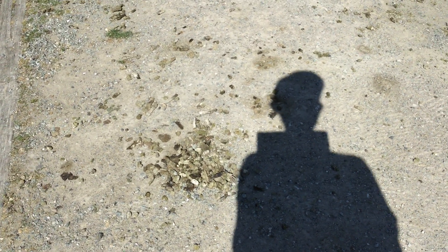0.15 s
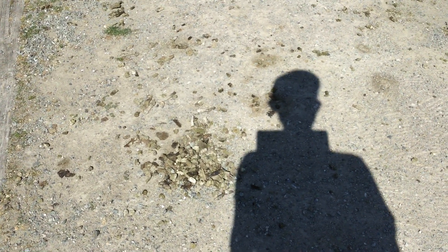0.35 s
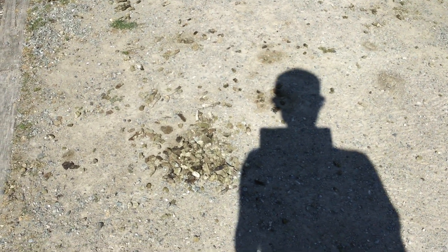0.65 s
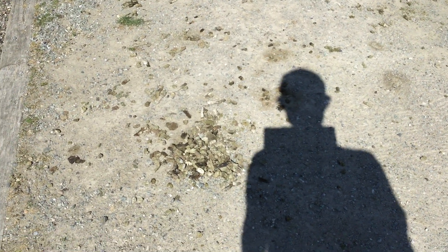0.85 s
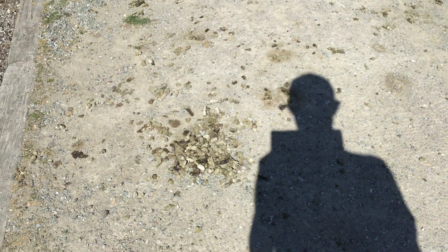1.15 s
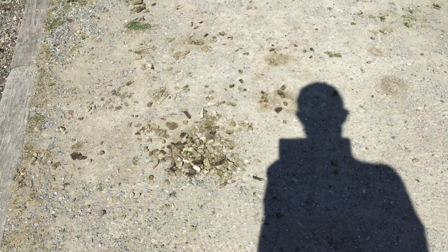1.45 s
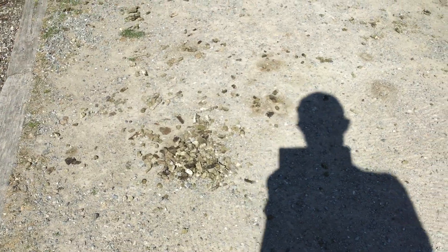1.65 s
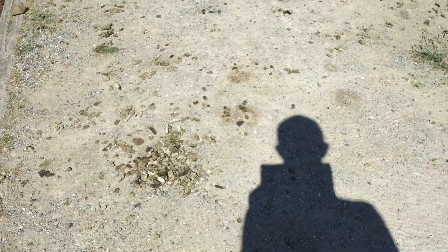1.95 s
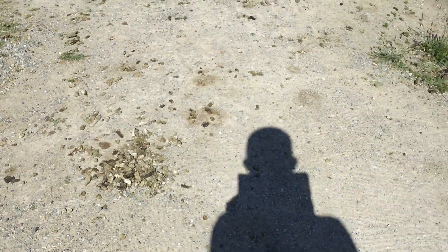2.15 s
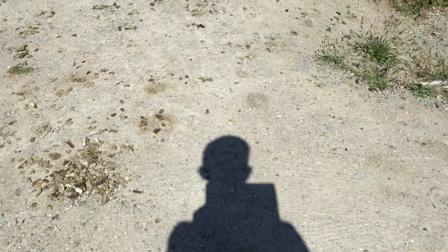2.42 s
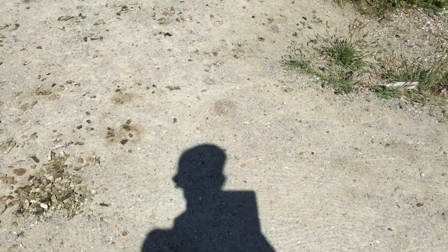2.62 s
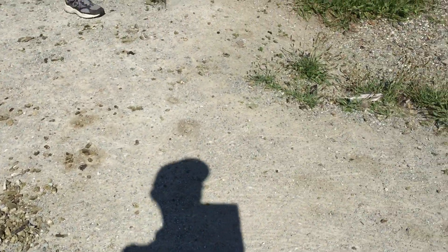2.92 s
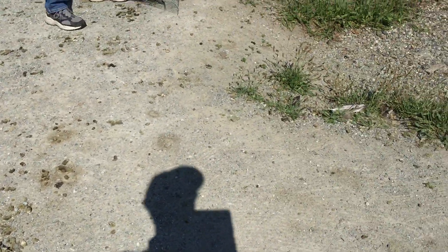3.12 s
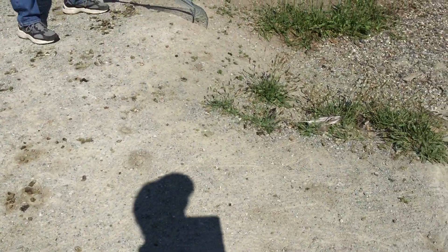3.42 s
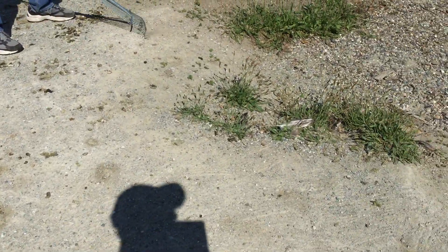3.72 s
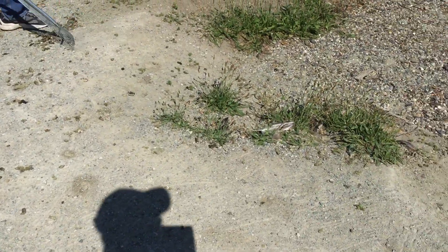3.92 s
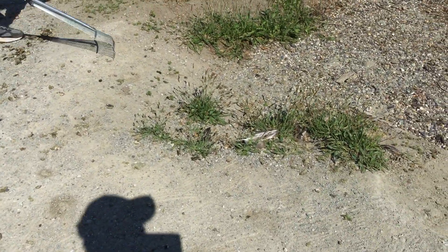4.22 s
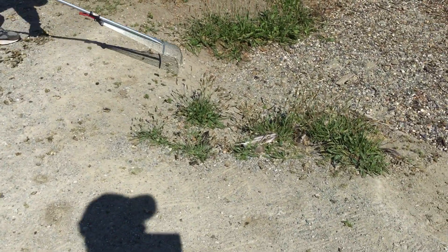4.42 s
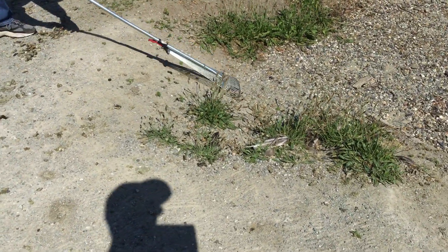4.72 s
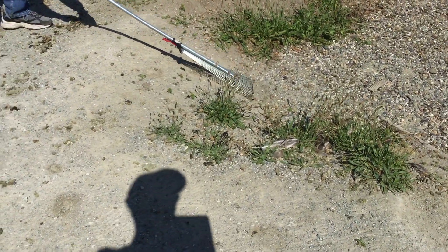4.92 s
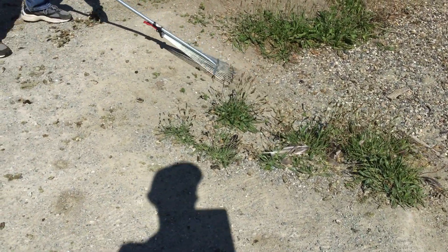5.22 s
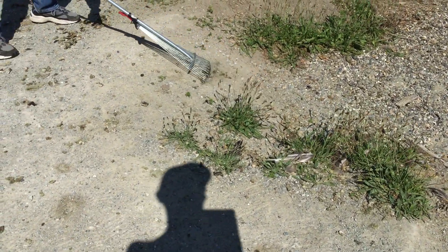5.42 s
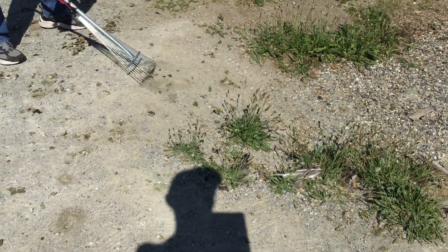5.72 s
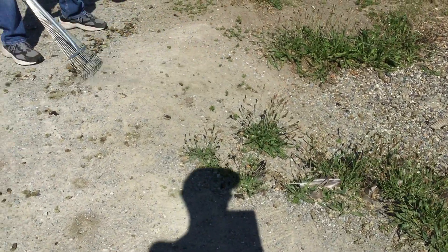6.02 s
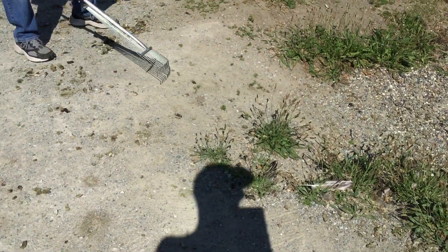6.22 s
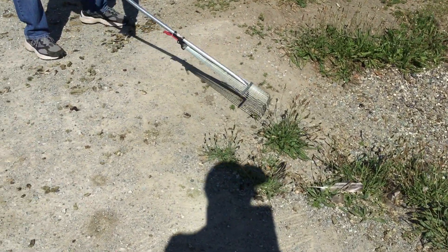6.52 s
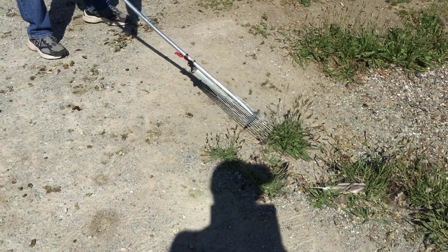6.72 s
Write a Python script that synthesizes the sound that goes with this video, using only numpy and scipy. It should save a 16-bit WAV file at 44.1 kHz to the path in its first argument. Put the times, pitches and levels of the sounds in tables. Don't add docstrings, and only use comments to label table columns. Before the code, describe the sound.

A few steps away outdoors, a springy metal fan rake pulls across dry gravel in separate strokes, each swelling from stone clicks to a bright, rattling scrape with short metallic ringing. Between strokes, pebbles crunch underfoot and grit ticks down. Wind rumbles and thumps on the handheld microphone, stronger near the end, with small taps and knocks on its casing. A faint bird chirp comes just before the last stroke starts.

```python
import sys
import numpy as np
from scipy import signal
from scipy.fft import rfft, irfft, next_fast_len
from scipy.io import wavfile
from scipy.ndimage import uniform_filter1d, map_coordinates

SR = 44100
rng = np.random.default_rng(int(sys.argv[2]) if len(sys.argv) > 2 else 0)


def materialize(psi):
    bounded = np.clip(np.atleast_2d(psi).T, -1, 1)
    quanta = np.round(bounded * 32767).astype(np.int16)
    wavfile.write(sys.argv[1], SR, quanta)


def linear_from_db(decibels):
    return 10 ** (np.asarray(decibels, float) / 20)


N = 302526

# (time [s], scrape level [dB])
STROKE_PRESSURE = [
    [(0.0, -44), (0.106, -46), (0.116, -41), (0.186, -61), (0.47, -75.5), (0.56, -90), (0.716, -74),
     (0.75, -92), (0.767, -66)],
    [(0.77, -61), (0.9, -67), (1.4, -46.5), (1.54, -41.5), (1.62, -51.5), (1.708, -61.5), (1.83, -65.5),
     (1.93, -82), (2.245, -76.5)],
    [(2.254, -57.5), (2.362, -60.5), (2.538, -51), (2.862, -44.5), (2.978, -64), (3.418, -82.5),
     (3.428, -64.5), (3.466, -92), (3.488, -53)],
    [(3.491, -50), (3.52, -60.5), (3.61, -59), (3.66, -50), (3.92, -50), (3.99, -63), (4.34, -71.5),
     (4.5, -96), (4.77, -70.5)],
    [(4.784, -54.5), (4.826, -62.5), (5.078, -66.5), (5.19, -52), (5.6, -51.5), (5.93, -47), (6.0, -49),
     (6.1, -73.5), (6.7, -79.5)],
]
# (time [s], scrape level [dB])
LAST_STROKE_PRESSURE = [
    (6.707, -54.5),
    (6.813, -63.5),
    (6.86, -59.5),
]
LIFTS = [.62, 2.0, 3.3, 4.55, 6.69]
# (grit brightness [dB], stone weight [dB])
FAN_ANGLES = [(-2.5, 0), (-4.5, -3.5), (-1.5, -2), (-3.5, 0.5), (-4.5, -0.5), (-4, -1)]
# (frequency [Hz], bandwidth [Hz], level [dB])
TINE_MODES = [(1850, 142, 0.5), (2420, 174, 1.5), (2900, 262, -1), (3646, 155, -1.5), (4020, 230, -3),
              (4655, 147, -5), (5450, 114, -2.5), (5920, 75, -3), (6500, 173, -2.5), (7100, 210, -10.5),
              (7720, 74, -8), (9400, 193, -5.5), (14400, 430, -10.5), (15600, 170, -10.5)]
# (time within the stroke [s], tine [Hz], extra level [dB])
TINE_TILTS = [(.1, 1850, 4.5), (.1, 2900, 9.5), (.1, 4020, 6), (.1, 5450, 5), (.1, 7720, -18),
              (1.3, 1850, 4), (1.3, 2900, 6), (1.3, 4020, 3.5), (1.3, 4655, -12), (1.3, 5920, -7),
              (1.3, 7720, -25), (1.3, 9400, -4.5), (2.6, 2420, -1.5), (2.6, 3646, 1.5), (2.6, 5450, -2),
              (2.6, 6500, 2), (2.6, 7720, 5), (2.6, 5920, 2.5), (2.6, 14400, -21), (3.8, 5920, 3.5),
              (3.8, 6500, 2.5), (3.8, 7720, 6.5), (3.8, 3646, -1.5), (3.8, 1850, -2.5), (5.5, 2420, 2),
              (5.5, 4655, 2.5), (5.5, 5450, -3), (5.5, 6500, -2.5), (5.5, 1850, -0.5), (5.5, 4020, -6),
              (5.5, 5920, -1.5), (5.5, 7720, 1.5), (6.8, 2420, 2.5), (6.8, 6500, 7), (6.8, 5450, -20),
              (5.5, 9400, -2), (2.6, 1850, -3), (.1, 6500, 0)]
# (frequency [Hz], density [dB per Hz])
GRIT_COLOUR = [(410, -8), (700, -8.5), (1240, -3.5), (2940, 1.5), (4020, -4), (4340, -4), (6590, -8.5),
               (8450, -9), (9380, -11), (10100, -8.5), (15800, -13.5)]
# (time [s], peak level [dB])
STONE_HEAPS = [(1.1103, -53), (1.1692, -52), (1.265, -32), (1.3039, -37.5), (1.3528, -38),
               (1.3852, -36), (1.4331, -28), (1.498, -25), (1.534, -26), (1.576, -27),
               (2.4712, -60), (2.5116, -33.5), (2.555, -63), (2.595, -32), (2.641, -31), (2.6897, -46),
                   (2.731, -27), (2.7685, -35), (2.7979, -33), (2.8463, -33), (2.8995, -39),
               (3.559, -57), (3.6236, -40), (3.676, -34), (3.742, -33), (3.781, -35), (3.8307, -38),
                    (3.8766, -33.5), (3.9044, -34),
               (5.2514, -45), (5.319, -32.5), (5.3621, -61), (5.4165, -59), (5.48, -34),
                      (5.5786, -45), (5.62, -42), (5.6579, -39), (5.689, -34), (5.7308, -36), (5.7677, -39),
                      (5.8156, -36), (5.8789, -34), (5.9054, -33), (5.9438, -50), (5.9787, -36)]
# (start [s], end [s], frequency [Hz], bandwidth [Hz], level [dB])
SINGING_TINES = [(.25, .48, 12800, 1500, -73), (1.017, 1.33, 1700, 300, -57.5),
                 (1.34, 1.61, 1900, 200, -57), (1.005, 1.27, 4020, 200, -63), (1.035, 1.2, 3000, 300, -62),
                 (1.01, 1.2, 5670, 250, -65), (1.338, 1.786, 2950, 200, -53.5),
                 (1.415, 1.58, 4020, 200, -50), (1.417, 1.6, 5450, 200, -48.5),
                 (1.526, 1.89, 6550, 160, -61.5), (1.44, 1.58, 9400, 100, -58),
                 (2.244, 2.77, 6500, 110, -62), (2.25, 2.35, 3620, 200, -61),
                 (2.303, 2.502, 5800, 140, -61), (2.385, 2.604, 3830, 200, -55.5),
                 (2.588, 2.777, 7400, 150, -55), (2.76, 3.05, 5970, 140, -62),
                 (2.786, 2.93, 7800, 200, -51.5), (2.8, 2.9, 2660, 250, -50),
                 (3.613, 3.718, 6000, 130, -52.5), (3.817, 4.02, 2935, 150, -49.5),
                 (3.831, 3.944, 2510, 150, -46.5), (4.014, 4.296, 6500, 150, -76),
                 (4.2, 4.3, 4420, 150, -74), (5.16, 5.298, 4680, 200, -56), (5.167, 5.703, 2390, 200, -58),
                 (5.2, 5.52, 5300, 80, -66), (5.348, 5.5, 1900, 100, -62), (5.4, 5.55, 7600, 150, -62),
                 (5.55, 5.7, 5450, 50, -67), (5.72, 6.094, 5470, 45, -55), (5.68, 6.02, 6500, 120, -62),
                 (5.7, 6.0, 6050, 60, -65), (5.68, 5.95, 4720, 150, -57), (5.77, 6.05, 7060, 150, -53.5),
                 (6.07, 6.198, 7550, 150, -75), (6.247, 6.46, 4350, 500, -73),
                 (6.265, 6.40, 2900, 250, -72), (5.65, 6.0, 9400, 250, -59), (0, 0.126, 1560, 250, -57)]
# (time [s], rumble level [dB])
WIND_STRENGTH = [(0, -56.5), (.2, -51), (.65, -54), (1.0, -51.5), (1.3, -53), (1.7, -50.5), (2.2, -50.5),
                 (2.6, -50), (3.2, -53), (3.8, -53), (4.2, -51), (4.5, -53), (5.6, -51.5), (5.8, -46.5),
                 (6.2, -43), (6.3, -51), (6.45, -44), (6.86, -46)]
# (frequency [Hz], density [dB per Hz])
RUMBLE_COLOUR = [(13, -42), (22, -36), (46, -2.5), (77, 2.5), (103, -0.5), (170, -9), (220, -32.5),
                 (370, -120)]
FLUTTER_COLOUR = [(65, -55), (110, -3), (166, -0.5), (200, -1.5), (421, -19), (699, -22), (1080, -40),
                  (1300, -48), (1690, -63), (2860, -120)]
# (frequency [Hz], density [dB per Hz])
AIR_COLOUR = [(150, -20), (250, -2), (459, -11.5), (746, -7.5), (1070, -15.5), (2890, -20), (3490, -29),
              (6520, -33.5), (10100, -40.5), (15800, -49)]
# (time [s], peak level [dB], pitch [Hz], length [s])
EDDY_THUMPS = [(0.094, -37.5, 100, 0.066), (0.342, -40, 69.5, 0.054), (0.809, -41.5, 95, 0.08),
               (0.998, -35, 99.3, 0.033), (1.558, -43, 64.6, 0.094), (2.045, -40, 98, 0.068),
               (2.287, -40, 80, 0.06), (2.375, -35.5, 84, 0.06), (2.67, -42.5, 93.3, 0.087),
               (2.773, -45, 77, 0.042), (3.245, -50, 70.0, 0.06), (3.751, -45, 88.8, 0.054),
               (4.193, -35, 80, 0.066), (4.337, -39, 80.7, 0.04), (4.581, -40, 82.5, 0.043),
               (4.681, -43.5, 78, 0.048), (4.886, -44, 67, 0.06), (5.134, -43, 105, 0.044),
               (5.314, -47, 112.7, 0.06), (5.762, -37, 83.4, 0.042), (5.799, -34.5, 108, 0.044),
               (5.859, -38.5, 169, 0.041), (5.942, -32, 97.5, 0.035), (6.038, -35, 96, 0.053),
               (6.177, -34, 120, 0.047), (6.396, -31.5, 127, 0.047), (6.429, -36, 114, 0.051),
               (6.627, -40, 82.6, 0.053), (6.699, -36.5, 87, 0.054), (6.799, -38, 80.7, 0.065)]
# (time [s], peak level [dB], pitch [Hz], sharp crack level [dB])
STONE_CATCHES = [(0.1097, -28, 2960, -31), (0.7695, -65, 3880, -10), (0.7816, -52.5, 1880, -8),
                 (0.8455, -55, 1780, -4.5), (0.9667, -52.5, 1850, -5.5), (1.0101, -48, 4200, -13),
                 (1.0505, -45, 3700, -9), (1.0796, -49, 5670, -6), (1.1692, -55, 3910, -5),
                 (1.265, -35.5, 2160, -17), (1.4329, -32, 2740, -19), (2.2538, -67, 6400, -14),
                 (2.276, -46, 6450, -27), (2.5113, -37, 4000, -38), (2.592, -54, 6450, -29),
                 (3.4202, -52, 1690, -14), (3.463, -56, 1780, -36), (3.491, -63, 4100, -14),
                 (3.6237, -60, 6050, -15), (3.679, -36, 5910, -19), (4.785, -43.5, 6070, -16),
                 (4.8404, -50.5, 3300, -4), (4.8788, -52, 4660, -13), (4.9197, -51, 4550, -5.5),
                 (5.1243, -56, 3520, -27), (5.172, -43, 4850, -11), (5.2008, -44, 2490, -2.5),
                 (5.2543, -47, 4700, 1), (6.7137, -47.5, 2500, -8), (6.8294, -53, 5840, -19),
                 (1.1106, -46, 2890, -8), (2.471, -45, 3790, -20), (2.6077, -41, 4500, -15),
                 (3.7401, -61, 2630, -23), (5.0117, -62, 3510, -10), (5.056, -54, 3490, -12),
                 (5.1016, -54, 4890, -17)]
# (start [s], end [s], rate [grains/s], level [dB], pitch [Hz])
GRIT_PATCHES = [(2.069, 2.235, 780, -63.5, 2300), (0.14, .6, 165, -70, 4500), (1.62, 2.0, 170, -74, 3900),
                (2.951, 3.25, 244, -61.5, 2500), (4.03, 4.75, 150, -70.5, 4000), (6.2, 6.7, 146, -70, 2700),
                (1.95, 2.08, 420, -68.5, 2200), (2.35, 2.75, 400, -63, 1260), (2.8, 3.2, 400, -65.5, 1100),
                (3.36, 3.5, 450, -64.5, 1330)]
# (time [s], peak level [dB], lowest [Hz], highest [Hz], decay to -60 dB [s])
FINGER_TAPS = [(1.967, -51, 396, 970, 0.02), (2.007, -58, 296, 1300, 0.041), (2.156, -52, 350, 920, 0.036),
               (3.973, -49.5, 600, 2200, 0.051), (4.044, -41.5, 445, 1310, 0.016),
               (4.695, -54, 600, 2530, 0.046), (5.554, -43, 596, 2800, 0.036), (5.568, -40, 396, 950, 0.04),
               (5.58, -44, 500, 3000, 0.026), (.264, -56.5, 550, 950, .03), (.5762, -62, 600, 3000, 0.011),
               (3.09, -56, 500, 895, .04), (4.699, -52, 550, 1100, 0.036)]
# (time [s], peak level [dB], pitch [Hz])
PEBBLE_CRUNCHES = [(0.2645, -45, 2990), (0.4404, -54, 3030), (0.5433, -49.5, 2060), (0.5756, -56, 2160),
                   (2.0777, -46, 2580), (2.091, -50, 2900), (2.1073, -45, 2230), (2.1206, -45, 1850),
                   (2.155, -47, 2440), (2.1647, -42, 2550), (2.175, -45, 2950), (2.1974, -39, 2590),
                   (2.214, -48, 1950), (2.222, -46, 3250), (2.2314, -63, 2980), (3.033, -43.5, 2400),
                   (3.1086, -47, 2000), (3.1512, -54, 2490), (3.1739, -48, 1720), (3.389, -47.5, 1870),
                   (4.1969, -49, 2960), (4.414, -57, 2040), (6.0764, -45, 1980), (6.2507, -54, 2880),
                   (6.4974, -58, 1780), (6.57, -45, 1990), (6.5938, -45, 1850), (6.6138, -44.5, 2000),
                   (6.6617, -48, 2040)]
# (time [s], peak level [dB], pitch [Hz])
GRIT_DRIPS = [(.4614, -63, 5160), (.541, -64, 5000), (.576, -52, 3500), (.63, -59, 7600),
              (.6729, -60, 6390), (.686, -67, 6000), (.708, -64, 7370), (.8134, -57, 5630),
              (.9014, -45, 5550), (.9344, -56, 5530), (1.952, -66, 4000), (2.009, -54, 3500),
              (2.0193, -58, 5910), (2.078, -57, 5000), (2.0924, -60, 4610), (2.1615, -61, 5910),
              (2.1924, -48, 5910), (3.1874, -57, 6040), (4.0617, -56, 6940), (4.238, -60, 3000),
              (4.2807, -58, 6400), (4.3091, -60, 5940), (4.327, -69, 2500), (4.3505, -53, 4820),
              (4.4563, -59, 3500), (4.559, -58, 5850), (6.0774, -44, 3000), (6.0874, -54, 7760),
              (6.1155, -52, 7520), (6.1424, -55, 7360), (6.1754, -57, 9270), (6.2218, -65, 5100),
              (6.2507, -53, 4650), (6.3484, -72, 4520), (6.409, -55, 4500), (6.4961, -58, 4860),
              (6.594, -58, 3000), (6.614, -59, 3000)]
# (time [s], peak level [dB], pitch [Hz], length [s])
CASING_BUMPS = [(1.743, -42.5, 155, 0.038), (1.971, -26.5, 230, 0.0057), (2.408, -33.5, 213, 0.0075),
                (2.542, -32.5, 156, 0.0048), (3.085, -28, 199, 0.0096), (3.206, -36, 203, 0.0044),
                (3.344, -38.5, 210, 0.014), (3.487, -42, 203, 0.0086), (3.989, -28.5, 209, 0.0084),
                (4.12, -33, 109, 0.04), (5.666, -37.5, 242, 0.017), (2.07, -54, 234, 0.012),
                (2.154, -48, 200, 0.016), (2.297, -44, 180, .012), (2.49, -46, 228, .01),
                (3.037, -47, 234, 0.0093), (3.627, -47.5, 282, 0.013), (4.126, -45, 300, 0.0063),
                (4.285, -46, 253, 0.01), (4.7, -44, 180, 0.01), (5.69, -42, 250, 0.011),
                (6.403, -43, 231, 0.015)]
# (time [s], length [s], first pitch [Hz], last pitch [Hz], level [dB])
BIRD_WHISTLE = (6.607, .024, 4200, 4600, -68)


def unit(x):
    return x / np.sqrt(np.mean(x ** 2) + 1e-20)


def curves(rows):
    s, *cols = np.transpose(rows)
    return [np.interp(np.arange(N) / SR, s, c) for c in cols]


def wobble(rate):
    knots = rng.standard_normal(int(N * rate / SR) + 4)
    at = np.arange(0, N + 32, 32) * rate / SR
    return map_coordinates(knots, [at]).repeat(32)[:N]


def filtered(x, response):
    m = next_fast_len(N + 8192)
    return irfft(rfft(x, m) * response(np.fft.rfftfreq(m, 1 / SR) + 1), m)[:N]


def coloured(x, spectrum):
    f, v = np.transpose(spectrum)
    return unit(filtered(x, lambda hz: linear_from_db(np.interp(np.log(hz), np.log(f), v))))


def ring(x, hz, width_hz):
    return signal.lfilter(*signal.iirpeak(min(hz, SR / 2 - 1000), hz / width_hz, SR), x)


def burst(t, low_hz, high_hz, t60):
    band = signal.butter(3, [low_hz, min(high_hz, SR / 2 - 1000)], "band", fs=SR, output="sos")
    return linear_from_db(-60 * t / t60) * unit(signal.sosfilt(band, rng.standard_normal(len(t))))


def place(out, s, sound):
    out[round(s * SR):][:len(sound)] += sound


def contacts(rate, spread_db, smooth):
    hit, size = rng.random(N), rng.standard_normal(N)
    sign, sand = rng.standard_normal(N), rng.standard_normal(N)
    stones_met = (hit < rate / SR) * linear_from_db(spread_db * size) * sign
    return unit(unit(stones_met) + smooth * sand)


def jolts(rate, fade_s, depth):
    hit, size = rng.random(N), rng.random(N)
    slip = signal.lfilter([1], [1, -np.exp(-1 / (fade_s * SR))], (hit < rate / SR) * size)
    return 1 + depth * slip


def patches(x, depth_db, bins, frames):
    z = signal.stft(x, nperseg=256)[2]
    field = uniform_filter1d(rng.standard_normal(z.shape), bins, axis=0)
    field = uniform_filter1d(field, frames, axis=1)
    return signal.istft(z * linear_from_db(depth_db * unit(field)), nperseg=256)[1][:N]


def rake():
    scrape_db, = curves(np.vstack(STROKE_PRESSURE + [LAST_STROKE_PRESSURE]))
    stroke = np.searchsorted(LIFTS, np.arange(N) / SR)
    clumps = jolts(rate=83, fade_s=0.0092, depth=0.057) * jolts(rate=300, fade_s=0.0047, depth=0.58)
    clumps = clumps * linear_from_db(0.25 * wobble(120))
    shared = contacts(rate=3500, spread_db=2.5, smooth=0.96)

    firm_db = -57.5
    harder_db, lighter_db = np.maximum(scrape_db - firm_db, 0), np.maximum(firm_db - scrape_db, 0)
    bright_db, weight_db = np.transpose(FAN_ANGLES)[:, stroke]
    bright_db = bright_db - 0.068 * harder_db - 0.27 * lighter_db
    weight_db = weight_db - 0.21 * harder_db + 0.11 * lighter_db

    lean_db = np.zeros((len(TINE_MODES), len(FAN_ANGLES)))
    for s, hz, db in TINE_TILTS:
        nearest = np.argmin([abs(mode[0] - hz) for mode in TINE_MODES])
        lean_db[nearest, np.searchsorted(LIFTS, s)] = db

    tines = 0
    for (hz, width_hz, db), extra_db in zip(TINE_MODES, lean_db):
        pluck = 0.17 * shared + np.roll(shared, rng.integers(N))
        pair = 0
        for k in (-1, 1):
            force = linear_from_db(3.5 * wobble(20)) * clumps * np.roll(pluck, 999 * k)
            pair = pair + ring(force, hz + 0.45 * k * width_hz, 0.66 * width_hz)
        tines = tines + linear_from_db(db + extra_db[stroke]) * pair

    ring_db = 2.5 - 0.1 * lighter_db
    sound = coloured(clumps * shared, GRIT_COLOUR) + linear_from_db(ring_db) * unit(tines)
    sound = patches(sound, depth_db=1.7, bins=9, frames=6)

    def under(edge_hz):
        return filtered(sound, lambda hz: 1 / (1 + (hz / edge_hz) ** 8))

    low, most = under(3500), under(8500)
    balanced = linear_from_db(weight_db) * unit(low) + unit(most - low) + linear_from_db(bright_db) * unit(sound - most)
    return (linear_from_db(scrape_db - 3.5) + heaps()) * balanced


def singing_tines():
    out = np.zeros(N)
    for start, end, hz, width_hz, db in SINGING_TINES:
        span = np.arange(round(start * SR), round(end * SR))
        swell = np.sin(np.pi * np.linspace(0, 1, len(span)) ** 0.72)
        noise = rng.standard_normal(N // 4)[np.arange(N) % (N // 4)]
        scrape = (linear_from_db(3.2 * wobble(35)) * noise)[span]
        out[span] += linear_from_db(db - 2.0) * swell * unit(ring(ring(scrape, hz, width_hz), hz, 3 * width_hz))
    return out


def wind():
    rumble_db, = curves(WIND_STRENGTH)
    mean_db = rumble_db.mean()
    slow_db = uniform_filter1d(rumble_db, round(0.19 * SR)) - mean_db
    flutter_db = mean_db - 5.5 + 1.47 * slow_db
    rumble = coloured(linear_from_db(0.67 * wobble(29)) * rng.standard_normal(N), RUMBLE_COLOUR)
    flutter = coloured(linear_from_db(2.83 * wobble(25)) * rng.standard_normal(N), FLUTTER_COLOUR)
    return linear_from_db(rumble_db) * rumble + linear_from_db(flutter_db) * flutter


def air():
    return linear_from_db(-67 + 1.1 * wobble(4.0)) * coloured(rng.standard_normal(N), AIR_COLOUR)


def eddies():
    out, t = np.zeros(N + SR), np.arange(SR // 4) / SR
    for (s, db, hz, length), turn in zip(EDDY_THUMPS, rng.random(len(EDDY_THUMPS))):
        u = np.clip(t / length, 0, 1)
        swell = np.sin(np.pi * u ** 0.56)
        place(out, s, linear_from_db(db - 2.5) * swell * np.sin(2 * np.pi * (hz * t + turn)))
    return out[:N]


def stones():
    out, t = np.zeros(N + SR), np.arange(SR // 10) / SR
    for s, db, hz, crack_db in STONE_CATCHES:
        knock = burst(t, hz / 1.5, hz * 1.5, t60=0.04)
        crack = linear_from_db(crack_db + 2.0) * burst(t, low_hz=2500, high_hz=14500, t60=0.13)
        place(out, s, linear_from_db(db - 2.5) * (knock + crack) * (1 - np.exp(-t / 0.0018)))
    return out[:N]


def crackle():
    out, t = np.zeros(N + SR), np.arange(400) / SR
    octaves, cycles, spread_db = 0.35, 1.6, 3.5
    for start, end, rate, db, hz in GRIT_PATCHES:
        when, pitch, size = rng.random((200, 3)).T
        when = start + np.cumsum(-np.log(when)) / rate
        pitch = np.minimum(hz * 2 ** (octaves * (2 * pitch - 1) * 2), SR / 3)[:, None]
        size = (when < end) * linear_from_db(db - spread_db * np.log(size))
        grains = size[:, None] * np.sin(2 * np.pi * pitch * t) * np.exp(-t * pitch / cycles)
        at = np.minimum(np.round(when * SR), N).astype(int)[:, None] + np.arange(len(t))
        out += np.bincount(at.ravel(), grains.ravel(), len(out))
    return out[:N]


def finger_taps():
    out, t = np.zeros(N + SR), np.arange(SR // 10) / SR
    for s, db, low_hz, high_hz, t60 in FINGER_TAPS:
        place(out, s, linear_from_db(db + 4.0) * burst(t, low_hz, high_hz, t60) * (1 - np.exp(-t / 0.00086)))
    return out[:N]


def tick(db, low_hz, high_hz, t60):
    t = np.arange(SR // 10) / SR
    return linear_from_db(db - 7.5) * burst(t, low_hz, high_hz, t60) * (1 - np.exp(-t / 0.0004))


def pebbles():
    out = np.zeros(N + SR)
    span, t60, after_s, after_db = 1.38, 0.019, 0.01, -9
    for s, db, hz in PEBBLE_CRUNCHES:
        place(out, s, tick(db, hz / span, hz * span, t60))
        for wait in rng.exponential(size=2):
            later = s + after_s * (0.51 + wait)
            place(out, later, tick(db + after_db, hz / span, hz * span, t60))
    return out[:N]


def drips():
    out, span = np.zeros(N + SR), 2.2
    for s, db, hz in GRIT_DRIPS:
        centre_hz = 0.66 * hz
        place(out, s, tick(db, centre_hz / span, centre_hz * span, t60=0.018))
    return out[:N]


def heaps():
    out, t = np.zeros(N + SR), np.arange(SR // 5) / SR
    rise_s, fade_s = 0.0078, 0.017
    load = (1 - np.exp(-t / rise_s)) * np.exp(-t / fade_s)
    for s, db in STONE_HEAPS:
        place(out, s, linear_from_db(db - 17) * load)
    return out[:N]


def bumps():
    out, t = np.zeros(N + SR), np.arange(SR // 10) / SR
    for s, db, hz, length in CASING_BUMPS:
        u = np.clip(t / length, 0, 1)
        swing = np.sin(2 * np.pi * hz * t * (1.55 - 0.6 * u))
        place(out, s, linear_from_db(db) * np.sin(np.pi * u) * (1 - u / 2) * swing)
    return out[:N]


def bird():
    s, length, from_hz, to_hz, db = BIRD_WHISTLE
    u = np.clip((np.arange(N) / SR - s) / length, 0, 1)
    pitch = to_hz + (from_hz - to_hz) * (1 - u) ** 2
    return linear_from_db(db) * np.sin(np.pi * u) * np.sin(2 * np.pi * np.cumsum(pitch) / SR)


def scene():
    gravel = rake() + singing_tines() + stones() + crackle() + pebbles() + drips()
    handling = finger_taps() + bumps()
    return (gravel + handling + wind() + eddies() + bird() + air())[None]


def band_limit(x):
    return signal.sosfilt(signal.butter(12, 16790, fs=SR, output="sos"), x)


def record(dry):
    top_hz, bass_hz = 15830, 40
    heard = filtered(dry[0], lambda hz: (hz < top_hz) / (1 + (bass_hz / hz) ** 4))
    return band_limit(heard[None])


dry = scene()
out = record(dry)
materialize(out)
```